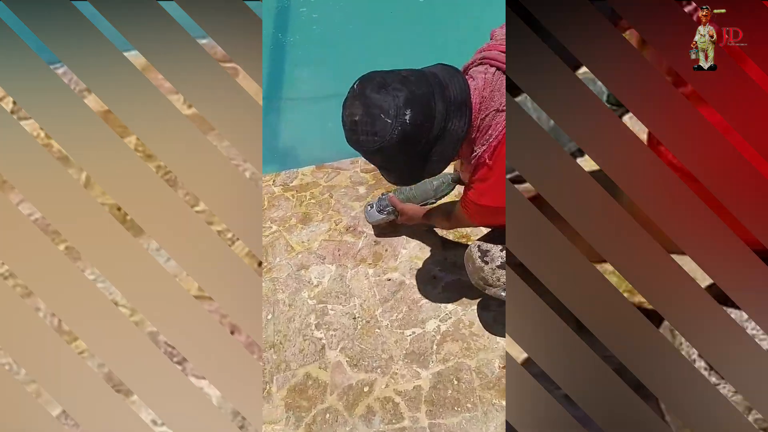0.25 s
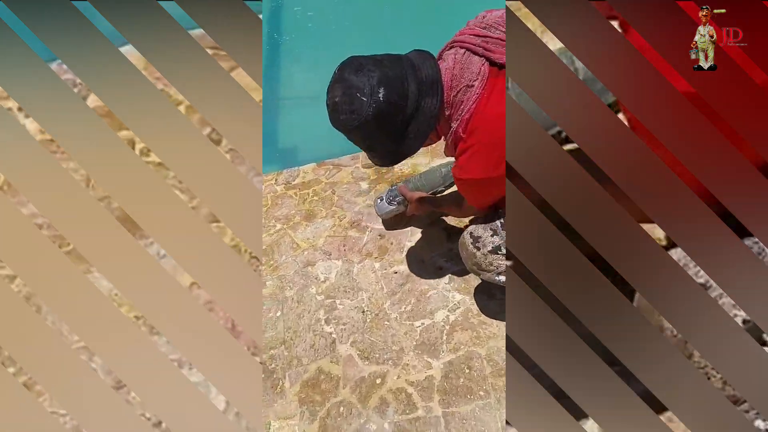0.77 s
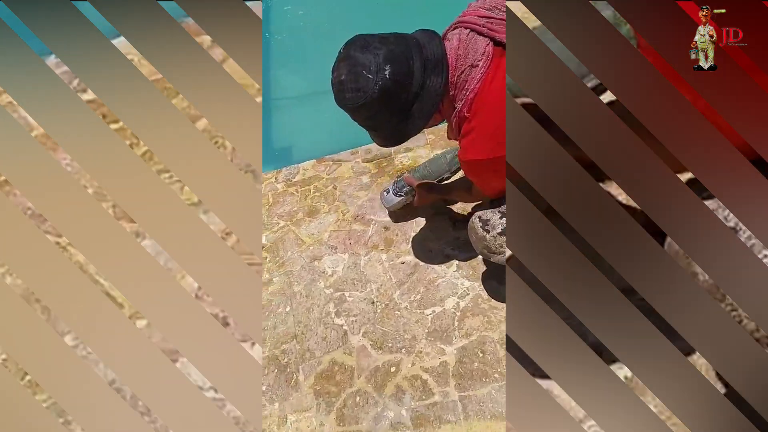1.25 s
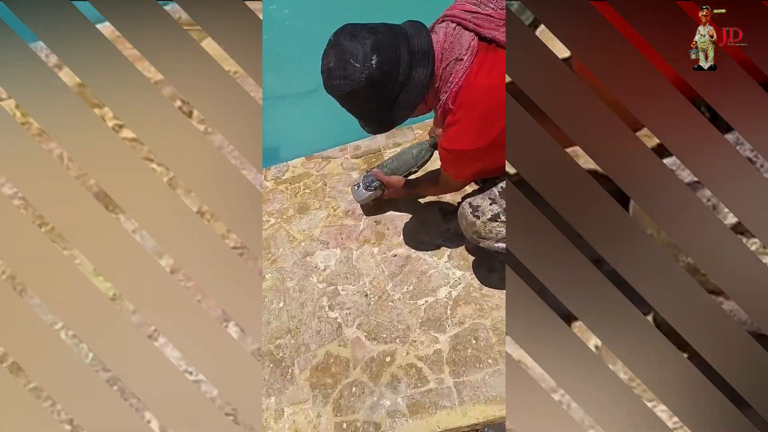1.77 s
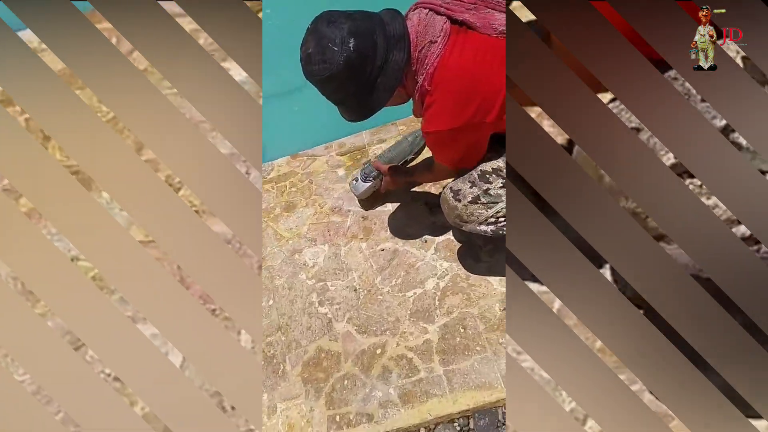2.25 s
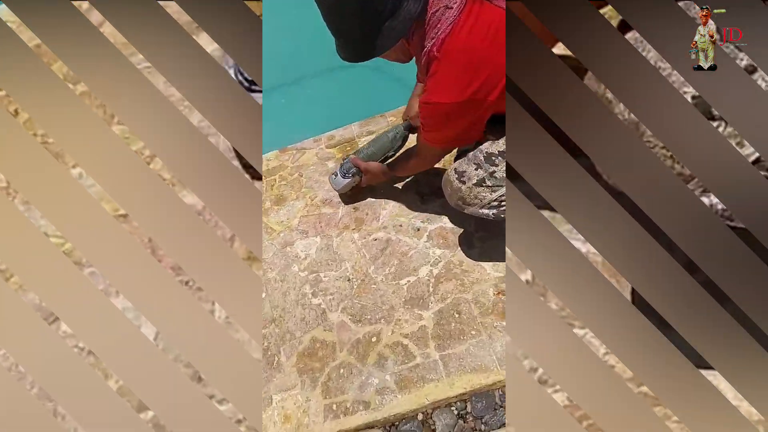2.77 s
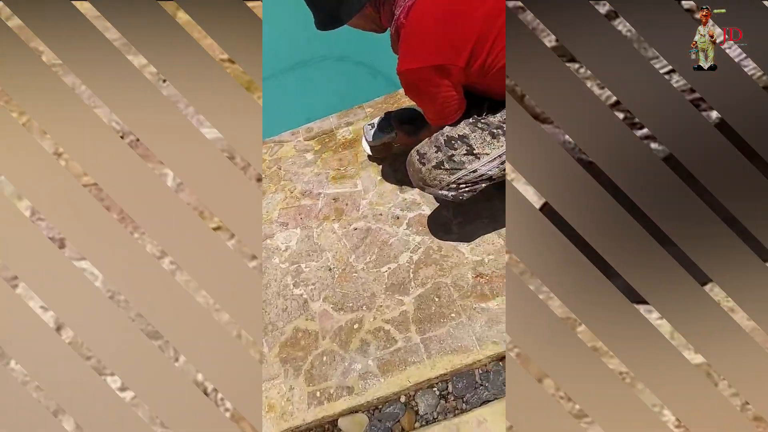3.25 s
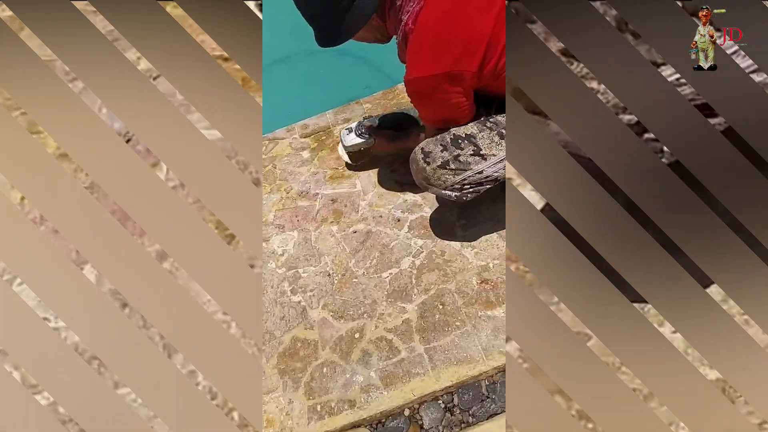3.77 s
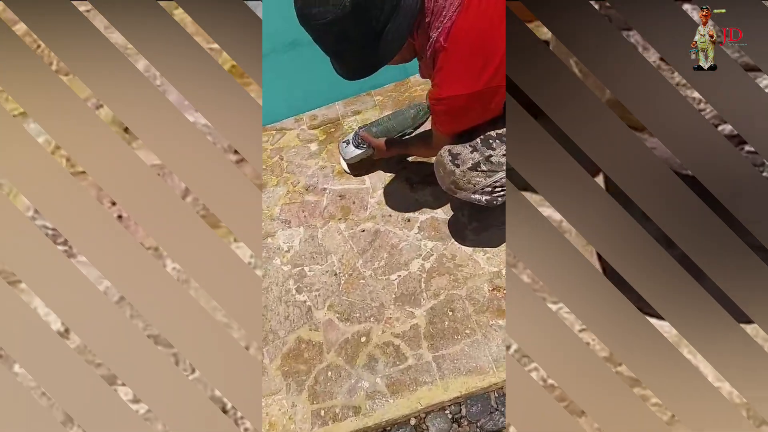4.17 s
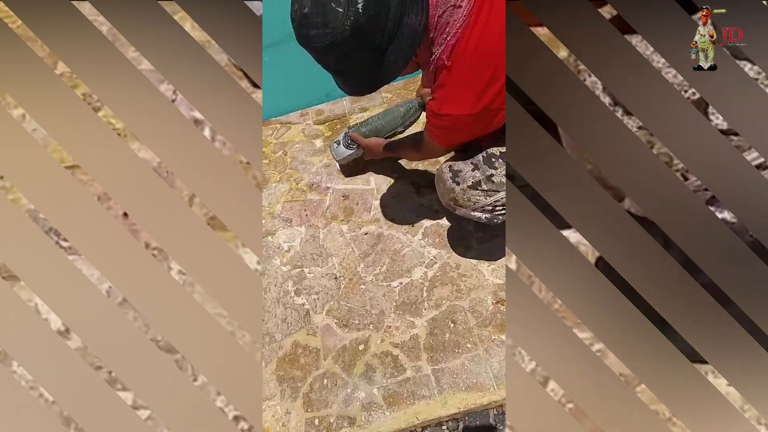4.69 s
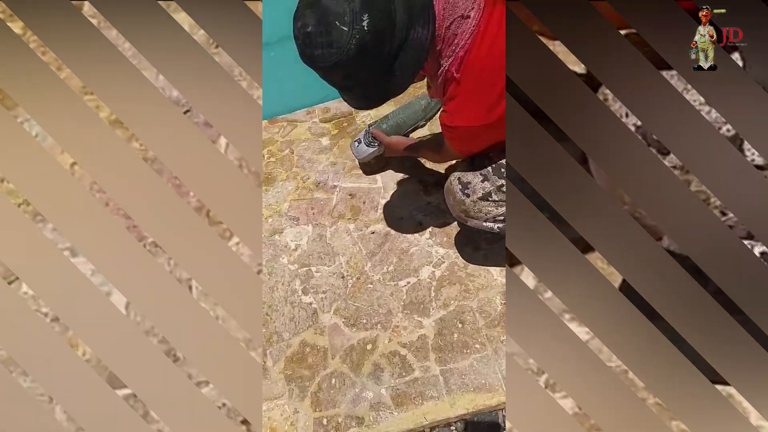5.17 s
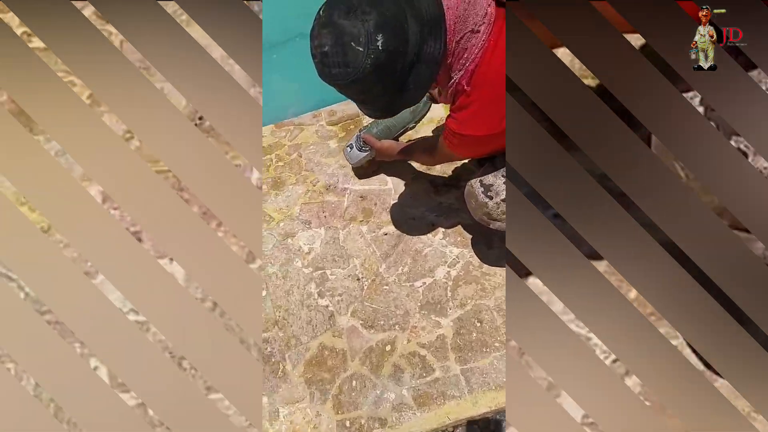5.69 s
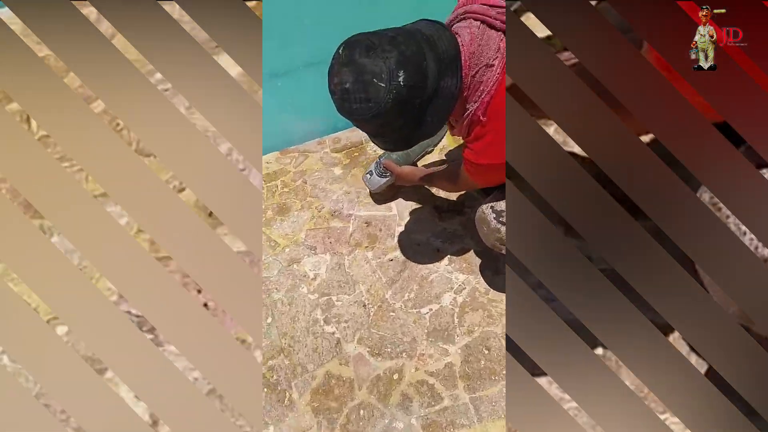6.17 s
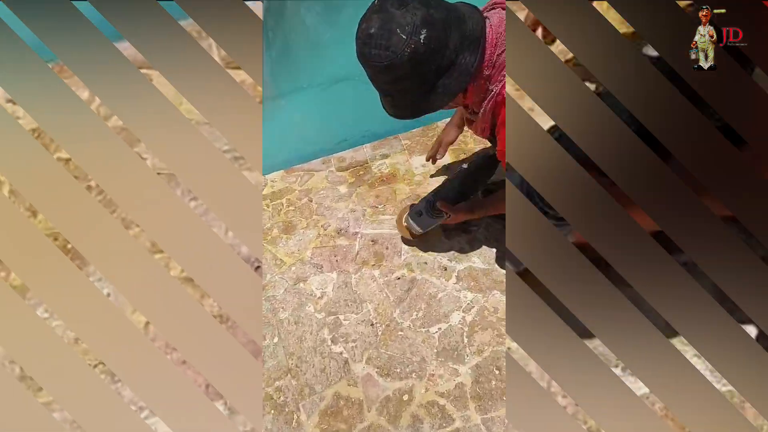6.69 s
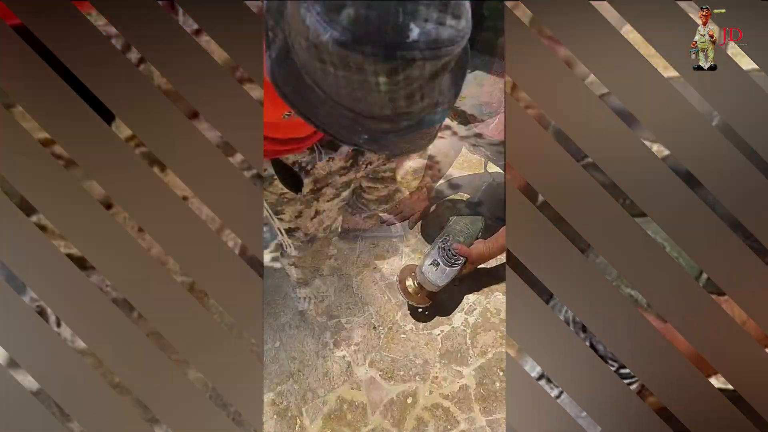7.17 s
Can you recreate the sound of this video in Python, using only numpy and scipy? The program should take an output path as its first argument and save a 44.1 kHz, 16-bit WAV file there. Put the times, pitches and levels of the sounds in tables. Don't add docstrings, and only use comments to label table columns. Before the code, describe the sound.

Harsh close grinding on stone with hissing fan and wavering high whine; the motor briefly runs down and restarts, then suddenly only faint buzzing insects remain.

```python
import sys
import numpy as np
from scipy import signal
from scipy.io import wavfile
from scipy.ndimage import uniform_filter1d

SR = 44100
rng = np.random.default_rng(int(sys.argv[2]) if len(sys.argv) > 2 else 0)


def materialize(psi):
    bounded = np.clip(np.atleast_2d(psi).T, -1, 1)
    quanta = np.round(bounded * 32767).astype(np.int16)
    wavfile.write(sys.argv[1], SR, quanta)


def linear_from_db(decibels):
    return 10 ** (np.asarray(decibels, float) / 20)


N = 327663
T = np.arange(N) / SR
FRAME, HOP = 512, 128

FREE_HZ, START_HZ, USUAL_HZ = 6200, 4863, 5000
SETTLE_S, COAST_S = .3, 2.37
OFF_S, ON_S = 3.168, 4.023
CYCLES_PER_TURN = 14
JUDDER_SHARE = .004
# start in seconds, load as share of free speed lost.
PUSHES = [(0, 0.181), (0.06, 0.248), (0.229, 0.205), (0.419, 0.091), (0.818, 0.182), (0.988, 0.082),
          (1.257, 0.195), (1.477, 0.086), (1.736, 0.2), (1.816, 0.081), (1.985, 0.098), (2.355, 0.207),
          (2.564, 0.234), (2.734, 0.258), (2.993, 0.064), (4.015, 0.069), (4.515, 0.123), (4.754, 0.193),
          (4.944, 0.295), (5.093, 0.199), (5.253, 0.269), (5.602, 0.292), (5.762, 0.247), (5.832, 0.328),
          (6.011, 0.256), (6.171, 0.304), (6.241, 0.263), (6.59, 0.05), (6.909, 0.031)]
# time in seconds, contact in dB.
CONTACT = [(0, 1), (.45, -0.5), (1.8, 0), (2.6, -1), (3.05, -.5), (3.45, -2), (3.6, -5), (3.93, -7),
           (4.15, -4), (4.25, -2.5), (4.45, -0.5), (4.7, -1.5), (5.6, -.5), (6.45, 0), (6.62, -3),
           (6.9, -2.5), (7.2, -2)]
# time in seconds, whine in dB, octave gain in dB, left-right in dB.
AIM = [(0, -23.5, 4, 8), (.52, -23.5, 0, -14), (.75, -30, 1, -2), (1.15, -26, 1, 1), (2.3, -31.5, 0.5, -2),
       (2.55, -20.5, 5, 5), (3.1, -26, -5, 1), (3.5, -20, 4.5, 5), (3.98, -28, -0.5, 16),
       (4.15, -24, 8.5, -1), (4.4, -20, 5, 3.5), (4.9, -27, -6, 2), (5.15, -19, 2, -1.5),
       (5.55, -20, -10, -0.5), (5.88, -26, -5, -4), (6.05, -24, 4.5, -2), (6.73, -24, 1.5, -3),
       (7.2, -20, -5.5, 0.5)]
# frequency in Hz, level in dB.
OCTAVE = [(7300, -19.5), (8000, -21.5), (8900, -19.5), (9300, -16), (9800, -29), (10600, -29),
          (11100, -26.5), (11600, -36)]
# frequency in Hz, left-right in dB.
OCTAVE_LEAN = [(7300, 16), (8000, 16), (9000, 7), (9600, 3), (11600, -0.5)]
# frequency in Hz, level in dB.
THIRD = [(11000, -31), (12000, -30), (12600, -44), (14300, -44), (15300, -37), (15700, -39), (15900, -90)]
ORDERS = (1, 2, 6, 12)
# level in dB, rise in dB per dB of contact.
ORDER_LEVELS = [(-52, -1.1), (-46.5, 1.6), (-32, 2.), (-46, 0.1)]

# frequency in Hz, density in dB per Hz.
DISC = [(1000, -32), (1400, -17), (1750, -4), (2050, -1), (2500, -4), (2950, -5), (3250, -12), (3800, -27)]
GUARD = [(2800, -32), (3400, -4.5), (3900, -2.5), (4700, -2), (5250, -5.5), (5700, -3.5), (6200, -4.5),
         (7000, -20.5)]
SLAB = [(250, -42), (450, -5.5), (800, 0), (1300, 2), (1700, -4), (2300, -40)]
FAN = [(5600, -36), (6400, -5.5), (7400, -5.5), (8300, -3.5), (9000, -2), (9800, -7.5), (10400, -8.5),
       (12000, -12.5), (14000, -26), (15700, -18)]
# frequency in Hz, width in Hz, level in dB.
HOUSING = [(7570, 75, -11.5), (8880, 350, -7), (12000, 150, -35), (10030, 99, -19)]
# frequency in Hz, share in common.
LIKENESS = [(30, .15), (90, 0.72), (400, 0.48), (1300, 0.55), (2400, 0.83), (4400, 0.59), (9000, 0.49)]
# frequency in Hz, left-right in dB.
GROUND_LEAN = [(40, 23), (90, 16), (200, 5), (400, 8), (700, -2), (1300, 2.5)]
# time in seconds, left delay in samples.
LAG = [(0, -3), (1, -2), (2, -3), (2.7, -0.5), (3.7, 3), (4.7, -1), (5.3, -2.5), (5.8, 3), (7, -5)]

# start in seconds, frequency in Hz, level in dB, time to fall 20 dB in
# seconds.
KNOCKS = [
    (3.53, 161, -42, 0.21),
    (4.2, 60, -51, .15),
    (5.72, 233, -33, .15),
    (6.0, 200, -41, 0.64),
]
# frequency in Hz, density in dB per Hz.
THUD = [(90, -29), (150, -3), (205, -5), (237, 9), (275, -6.5), (450, -3.5), (700, -23)]
# frequency in Hz, density in dB per Hz.
WIND = [(10, 4), (30, 0), (60, -5), (100, -16), (200, -39)]

HUM_HZ, HUM_DB = 100, -60
# centre in seconds, length in seconds, rise in dB.
SWELLS = [
    (.9, .3, 7),
    (2.096, 0.29, -5),
    (3.1, .8, 10.5),
    (3.85, 0.2, 11),
    (4.35, 0.66, 17),
    (5.646, .2, 12),
    (6.05, 0.13, 14),
    (6.45, 0.28, 13),
    (7.1, .3, 6),
]

CUT_S, FADE_S, FADE_DB = 7.1985, .45, -5
YARD_S, GAP_DB, HUM_BACK_S = 7.238, -40, 7.311
# frequency in Hz, threshold in dB.
VANISHING = [(2600, -16), (3300, -.5), (4000, -1.5), (5300, 0), (6900, -5), (9300, -9), (10300, 2),
             (11800, 3), (12400, 0), (13500, 1), (14800, 3), (15600, 6)]

CICADA_PER_S = 84
# frequency in Hz, width in Hz, level in dB.
CICADA = [(6575, 260, 0), (7150, 400, -5), (5920, 90, -16), (7890, 250, -11), (1580, 30, -20)]
# frequency in Hz, density in dB per Hz.
YARD_AIR = [(40, -6), (150, -8), (500, -11), (1600, -10), (3000, -13), (4700, -17), (5600, -16),
            (6500, -11), (8000, -12), (10600, -19), (15000, -30)]
# start in seconds, level in dB, frequency in Hz, t60 in seconds, left-right in dB.
TICKS = [
    (7.272, -33, 8700, .04, 7),
    (7.328, -48.5, 3500, .02, -2),
    (7.335, -40, 3600, .02, -3),
    (7.259, -44, 2300, 0.033, 0),
    (7.209, -75.5, 3000, .03, 5),
]


def evened(x):
    return x / np.sqrt(np.mean(x ** 2) + 1e-20)


def read(points, hz):
    f, value = np.transpose(points)
    return np.interp(np.log(hz + 1), np.log(f + 1), value)


def curves(rows):
    s, *columns = np.transpose(rows)
    return [np.interp(T, s, c) for c in columns]


def panned(db):
    return linear_from_db(np.array([db / 2, -db / 2]))


def drift(rate_hz, channels=1):
    size = max(round(SR / rate_hz), 1)
    once = uniform_filter1d(rng.standard_normal((channels, N)), size)
    return evened(uniform_filter1d(once, size))


def resonate(x, hz, width_hz):
    return signal.lfilter(*signal.iirpeak(hz, hz / width_hz, SR), x)


def resonate_twice(x, hz, width_hz):
    return resonate(resonate(x, hz, width_hz), hz, width_hz)


def noise(shape, grit_db=0., grit_hz=600, patchy_db=-1.5, twist=0., chips=0., lean=((1, 0), (2, 0))):
    drive = rng.standard_normal((2, N)) * linear_from_db(grit_db * drift(grit_hz))
    drive += chips * (rng.random(N) < 70 / SR) * rng.standard_normal(N)
    hz, t, (left, other) = signal.stft(drive, SR, nperseg=FRAME, noverlap=FRAME - HOP)

    patches, turns = rng.standard_normal((2, len(hz), len(t)))
    patches = evened(uniform_filter1d(uniform_filter1d(patches, 5, 0), 25, 1))
    turns = evened(uniform_filter1d(uniform_filter1d(turns, 24, 0), 200, 1))

    delay_s = np.interp(t, *np.transpose(LAG)) / SR
    phase = 2 * np.pi * hz[:, None] * delay_s + twist * turns
    same = np.clip(read(LIKENESS, hz), 0, 1)[:, None]
    right = same * left * np.exp(1j * phase) + np.sqrt(1 - same ** 2) * other
    z = np.array([left, right])
    z *= linear_from_db(read(shape, hz)[:, None] + patchy_db * patches)
    z *= panned(read(lean, hz))[:, :, None]
    return evened(signal.istft(z, SR, nperseg=FRAME, noverlap=FRAME - HOP)[1][:, :N])


def grinding(whine_hz, contact_db):
    chatter = linear_from_db(0.21 * drift(35) + .6 * drift(6.1))
    speed_db = 20 * np.log10(whine_hz / USUAL_HZ)
    side_db = curves(AIM)[2]

    disc = noise(DISC, grit_db=1.6, grit_hz=450, patchy_db=.5, chips=7.)
    disc = linear_from_db(contact_db - 15) * panned(np.array([-1.8])) * disc
    guard_db = .5 * contact_db + .3 * speed_db + 1.27 * drift(7) - 18.5
    guard = linear_from_db(guard_db) * noise(GUARD, grit_db=-0.6, patchy_db=2.0, twist=1.28)
    slab = noise(SLAB, grit_db=1.0, grit_hz=150, patchy_db=0.17, twist=0.28, lean=GROUND_LEAN)
    slab = linear_from_db(0.35 * contact_db - 27.5) * slab

    air = noise(FAN, grit_db=0.43, patchy_db=0.84, twist=2.6)
    white = rng.standard_normal((2, N))
    for mode_hz, width_hz, db in HOUSING:
        air = air + linear_from_db(db) * evened(resonate(white, mode_hz, width_hz))
    hiss_db = -14.5 + 1.1 * speed_db + 0.083 * contact_db + 0.39 * drift(14.0)
    hiss = linear_from_db(hiss_db) * panned(2.0 + 0.17 * side_db) * evened(air)
    return chatter * (disc + guard + slab) + hiss


def rotor_speed():
    s, load = np.transpose(PUSHES)
    starts = np.sort(np.r_[0, s[1:], OFF_S, ON_S])
    ends = np.r_[starts[1:], N / SR]
    whine_hz, now_hz = np.zeros(N), START_HZ
    for a, b in zip(starts, ends):
        push = max(np.searchsorted(s, a, "right") - 1, 0)
        goal_hz, slow_s = FREE_HZ * (1 - load[push]), SETTLE_S
        if OFF_S <= a < ON_S:
            goal_hz, slow_s = 0, COAST_S
        part = slice(int(np.ceil(a * SR)), int(np.ceil(b * SR)))
        whine_hz[part] = goal_hz + (now_hz - goal_hz) * np.exp(-(T[part] - a) / slow_s)
        now_hz = goal_hz + (now_hz - goal_hz) * np.exp(-(b - a) / slow_s)
    return whine_hz


def motor(whine_hz, contact_db):
    whine_db, octave_db, side_db = curves(AIM)
    judder = JUDDER_SHARE * linear_from_db(contact_db) * drift(14)[0]
    cycles = np.cumsum(whine_hz * (1 + 0.00127 * drift(61.5)[0] + judder)) / SR
    octave_side_db = read(OCTAVE_LEAN, 2 * whine_hz) + 0.32 * side_db
    tones = [(whine_db, side_db),
             (read(OCTAVE, 2 * whine_hz) + octave_db, octave_side_db),
             (read(THIRD, 3 * whine_hz), 0 * whine_hz)]
    out = 0
    for k, (db, pan_db) in enumerate(tones, 1):
        wobble = k * cycles + 0.085 * drift(1.63, channels=2)
        flutter_db = 2.7 * drift(25, channels=2) + 3 * drift(11, channels=2) - 3
        gain = np.sqrt(2) * linear_from_db(db + flutter_db) * panned(pan_db)
        out = out + gain * np.cos(2 * np.pi * wobble)

    rotor_phase = 2 * np.pi * cycles / CYCLES_PER_TURN
    for k, (db, follow) in zip(ORDERS, ORDER_LEVELS):
        order_db = db + follow * (contact_db + 2) + 2.84 * drift(8.2)
        out = out + np.sqrt(2) * linear_from_db(order_db) * np.cos(k * rotor_phase)

    teeth = ORDERS[2] * rotor_phase
    rough = drift(420, channels=2)
    return out + linear_from_db(contact_db - 25.5) * (rough[0] * np.cos(teeth) + rough[1] * np.sin(teeth))


def ground_thud(whine_hz):
    speed_db = 20 * np.log10(np.maximum(whine_hz / USUAL_HZ, .9))
    thud_db = -39 + 4.1 * speed_db + 1.4 * drift(2.5)
    return linear_from_db(thud_db) * noise(THUD, patchy_db=1.5, grit_db=0.1, grit_hz=59.96, lean=GROUND_LEAN)


def knocks():
    out = np.zeros((2, N))
    for s, hz, db, fall_s in KNOCKS:
        at, age = round(s * SR), T[:SR // 2]
        burst = evened(resonate_twice(rng.standard_normal(len(age)), hz, hz * .35))
        envelope = np.minimum(age / 0.019, 1) * linear_from_db(db - 60 * age / (3 * fall_s))
        out[:, at:at + len(age)] += burst * envelope * panned(np.array([4.]))
    return out


def wind(whine_hz):
    wind_db = -56.5 + 1.5 * drift(2.5) + 6 * np.log10(whine_hz / USUAL_HZ)
    return linear_from_db(wind_db) * noise(WIND, lean=GROUND_LEAN)


def cicadas(gap_db):
    level_db = gap_db - 38.5 + .8 * drift(15)
    beat = (CICADA_PER_S * T + 0.21 * drift(30)[0]) % 1
    carrier = 0.99 * np.cos(2 * np.pi * CICADA[0][0] * T) + rng.standard_normal((2, N))
    clicks = np.sin(np.pi * beat ** 0.67) ** 2 * carrier
    clicks = clicks + 0.83 * rng.standard_normal((2, N))
    drums = sum(linear_from_db(db) * evened(resonate_twice(clicks, hz, width_hz)) for hz, width_hz, db in CICADA)
    return linear_from_db(level_db) * panned(np.array([-3.])) * evened(drums)


def ticks():
    out = np.zeros((2, N))
    for s, db, hz, fall_s, pan_db in TICKS:
        at, age = round(s * SR), T[:2000]
        burst = evened(resonate_twice(rng.standard_normal((2, len(age))), hz, hz * .3))
        out[:, at:at + len(age)] += burst * linear_from_db(db - 60 * age / fall_s) * panned(np.array([pan_db]))
    return out


def hum(db):
    return linear_from_db(db) * evened(resonate_twice(rng.standard_normal(N), HUM_HZ, 24))


def yard():
    gap_db = GAP_DB * np.clip((YARD_S - T) / .003, 0, 1)
    air_db = gap_db - 48.5 + 4.0 * np.exp(-abs(T - YARD_S) / 0.021)
    hum_db = gap_db - 43.0 - 15 * np.clip((HUM_BACK_S - T) / .018 + .5, 0, 1)
    air = linear_from_db(air_db) * noise(YARD_AIR, patchy_db=2.5)
    return cicadas(gap_db) + air + hum(hum_db) + ticks()


def without_weak_bins(x):
    hz, t, z = signal.stft(x, SR, "cosine", nperseg=2048, noverlap=1024)
    power = uniform_filter1d((abs(z) ** 2).mean(0), size=3, axis=0)
    near = uniform_filter1d(np.sqrt(power), size=24, axis=0) ** 2
    moods = uniform_filter1d(rng.standard_normal((len(hz) // 16 + 1, len(t))), size=3, axis=1)
    moods = np.repeat(evened(moods), 16, axis=0)[:len(hz)]
    threshold_db = read(VANISHING, hz)[:, None] + 2.3 * moods
    kept = power > near * linear_from_db(threshold_db) ** 2
    return signal.istft(z * kept, SR, "cosine", nperseg=2048, noverlap=1024)[1][:, :N]


def scene():
    whine_hz, contact_db = rotor_speed(), curves(CONTACT)[0]
    tool = motor(whine_hz, contact_db) + grinding(whine_hz, contact_db)
    fading = linear_from_db(FADE_DB * np.clip(1 - (CUT_S - T) / FADE_S, 0, 1))
    swell_db = sum(db * np.exp(-(2 * (T - s) / length_s) ** 2) for s, length_s, db in SWELLS)
    around = ground_thud(whine_hz) + knocks() + wind(whine_hz) + hum(HUM_DB + swell_db)
    working = without_weak_bins(fading * tool + around)
    before = np.clip((CUT_S - T) / 0.00032, 0, 1)
    return before * working + (1 - before) * yard()


def band_limit(x):
    return signal.sosfilt(signal.butter(12, 15660, fs=SR, output="sos"), x)


def record(dry):
    over = np.maximum(abs(dry) - .75, 0)
    limited = dry - np.sign(dry) * (over - .3 * np.tanh(over / .3))
    return band_limit(np.clip(limited, -1, 1))


dry = scene()
out = record(dry)
materialize(out)
```